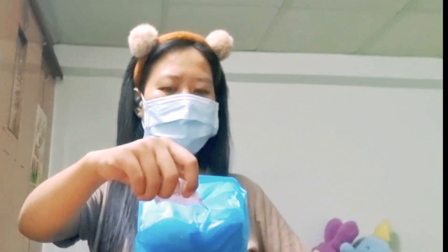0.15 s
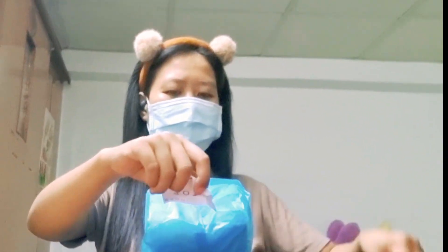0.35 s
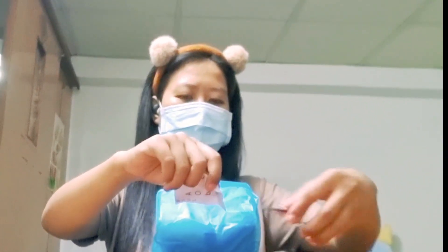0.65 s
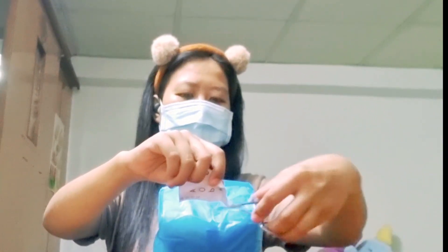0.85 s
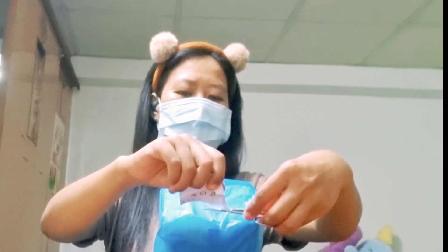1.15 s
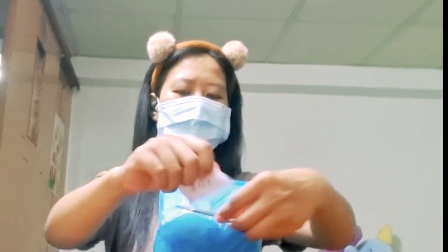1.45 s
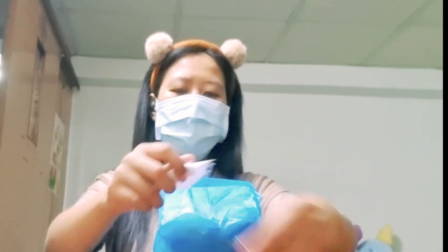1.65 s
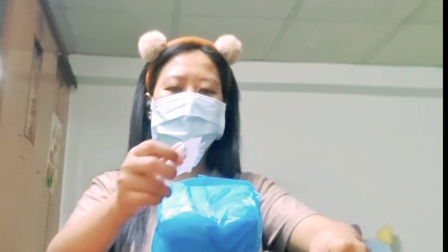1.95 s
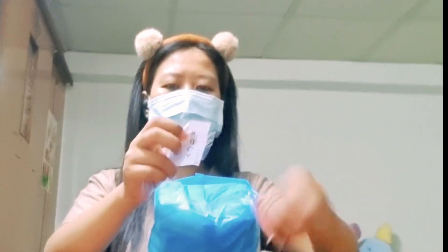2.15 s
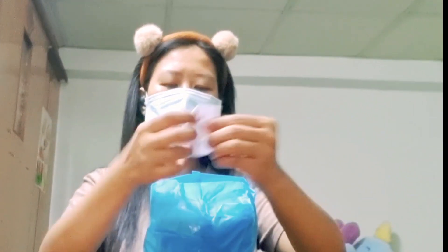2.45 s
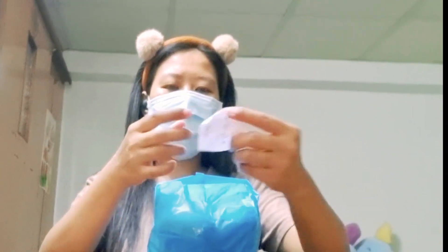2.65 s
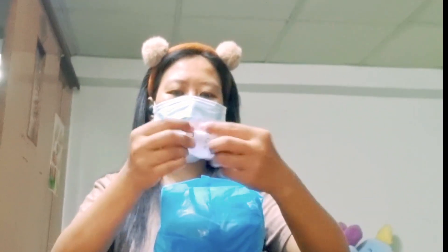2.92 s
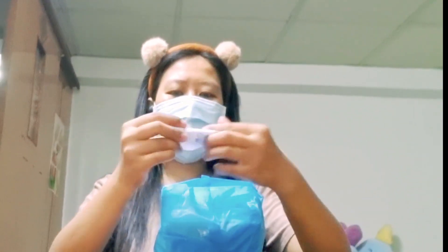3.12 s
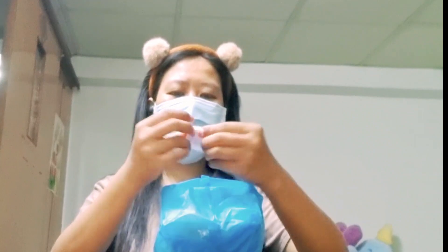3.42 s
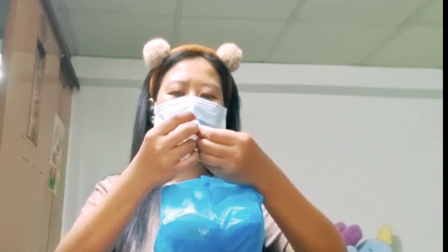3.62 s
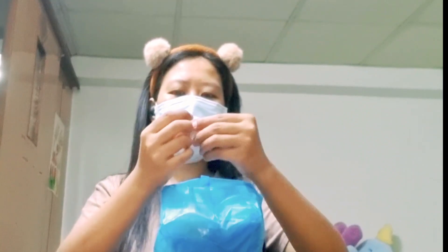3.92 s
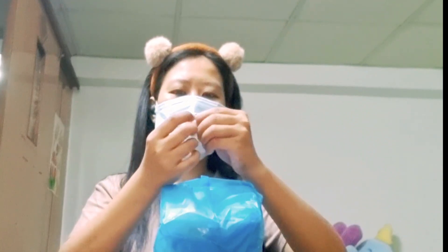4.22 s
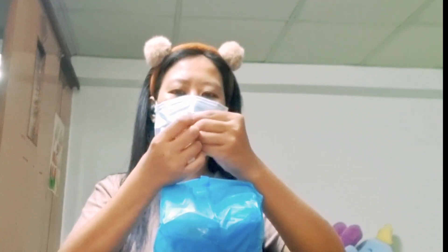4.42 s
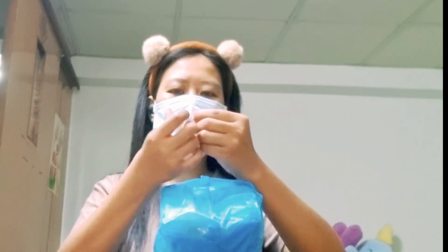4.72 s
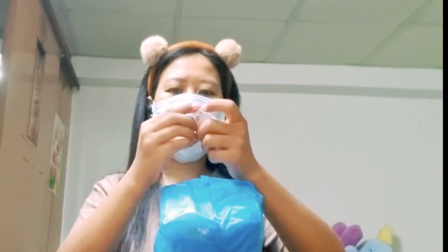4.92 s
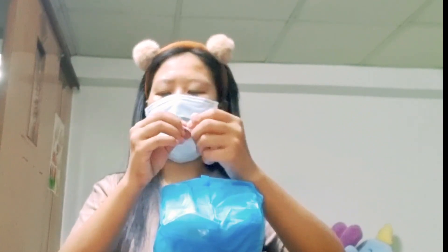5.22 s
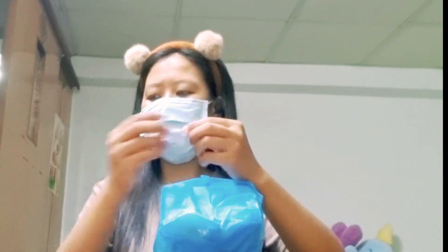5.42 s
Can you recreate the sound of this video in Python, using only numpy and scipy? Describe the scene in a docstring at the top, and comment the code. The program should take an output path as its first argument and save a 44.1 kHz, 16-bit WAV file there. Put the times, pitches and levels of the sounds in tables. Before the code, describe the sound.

Two knocks on a desk, crinkling plastic and a snip, a sharp rattle of dropped scissors, then lighter crackles.

```python
"""At a desk in a quiet room, hands pick at a small plastic pouch half a metre from a phone.
Stick-slip friction makes the film crinkle; its creases buckle with a snap and set small panels ringing.
A cutter is lifted and later dropped, rattling to rest as each impact excites the modes of desk and blades.
Sound mirrored by the desk top interferes with the direct sound at the phone's two microphone ports.
The desk thumps, the walls add a short reverberation, and the room rumbles faintly behind."""
import sys
import numpy as np
from scipy import signal
from scipy.fft import rfft, irfft, next_fast_len
from scipy.io import wavfile
from scipy.ndimage import uniform_filter1d, map_coordinates

SR = 44100
rng = np.random.default_rng(int(sys.argv[2]) if len(sys.argv) > 2 else 0)


def put_to_file(sound):
    """Save the sound as 16-bit audio at rate SR, in the file named by the first command-line argument."""
    columns = np.atleast_2d(sound).T  # one column per channel
    safe = np.clip(columns, -1, 1)
    whole_steps = np.round(safe * 32767)
    wavfile.write(sys.argv[1], SR, whole_steps.astype(np.int16))


N = 245637
SIZE = next_fast_len(N + SR)
HZ, TIME = np.arange(SIZE // 2 + 1) * SR / SIZE, np.arange(N) / SR

# Friction on the film: (time [s], rub level [dB], crackle level [dB])
FRICTION = [(0.0, -43.5, -50), (0.2, -50, -64.5), (0.68, -53.5, -62.5), (0.93, -53, -69),
            (1.041, -45, -65.5), (1.2, -51, -47), (1.5, -49.5, -50.5), (1.72, -53.5, -57),
            (2.0, -55.5, -72), (2.13, -53, -42), (2.28, -69, -64), (2.46, -77.5, -78.5), (2.642, -48, -43),
            (2.8, -74, -74.5), (3.149, -68.5, -45), (3.45, -65, -61), (3.818, -65.5, -55.5),
            (3.971, -74, -64), (4.59, -74, -80.5), (4.92, -67, -71.5), (5.099, -57, -47.5),
            (5.32, -73, -71), (5.499, -72, -51.5)]
# In the next three tables, the dB columns after the level are relative to it.
# Creases buckling: (time [s], level [dB], body [dB], treble [dB], t60 [s], panel pitch [Hz])
BUCKLES = [(0.111, -27, -6, -6, 0.056, 2370), (0.156, -37, -21, 0.5, 0.023, 4800),
           (0.192, -37.5, 7.5, -24, 0.06, 1530), (0.43, -35, -30, -8, 0.045, 2320),
           (0.4605, -34.5, -23, -14, 0.082, 4800), (0.4857, -37.5, 4.5, -3.5, 0.03, 2220),
           (0.5056, -30, -3, -10.5, 0.061, 2430), (0.545, -27, -1, -1.5, 0.054, 4300),
           (0.561, -21, -7, -2, 0.022, 2530), (0.5663, -24, -3, -1, 0.026, 4500),
           (0.815, -34.5, -4.5, -18, 0.084, 2700), (1.0543, -41, 1, -11, 0.22, 2560),
           (1.137, -34, -5, -15, 0.042, 1660), (1.155, -32, -22, 6, 0.041, 1750),
           (1.1703, -38, -9, 5.5, 0.023, 4560), (1.1872, -15, -8, -6, 0.034, 2710),
           (1.227, -33.5, -6, -3, 0.1, 2360), (1.277, -42, -7.5, -7, 0.1, 1620),
           (1.3039, -32.5, -15, -5, 0.064, 1520), (1.313, -32, -20, -8, 0.027, 2600),
           (1.3189, -25, -12, -1.5, 0.041, 4840), (1.3357, -26, -7.5, -3, 0.04, 2680),
           (1.496, -22, -14.5, -1.5, 0.066, 1490), (1.5106, -18, -2.5, -2, 0.023, 2000),
           (1.601, -36, -3, -8, 0.07, 2470), (1.6272, -29.5, 0, 1, 0.026, 2350),
           (2.4525, -50.5, 10.5, -6.5, 0.085, 3940), (2.544, -21, -6.5, -5.5, 0.094, 2970),
           (2.5553, -16.5, -4.5, -9.5, 0.039, 2080), (2.5614, -19, -2, -11, 0.062, 1610),
           (2.6785, -26.5, -8.5, -0.5, 0.042, 3900), (2.766, -44, -8.5, -3, 0.047, 2880),
           (2.9718, -46, -5.5, -1.5, 0.055, 4280), (3.08, -40.5, -7, 0.5, 0.051, 2700),
           (3.1003, -31, -2, -5.5, 0.0078, 2820), (3.112, -33, -16, -1, 0.024, 2780),
           (3.191, -45, -22, -8, .03, 2650), (3.212, -41, -28, -16, 0.018, 2000),
           (3.326, -40, 6.5, -7, 0.095, 1470), (3.3447, -34, -27, -10.5, 0.063, 2730),
           (3.418, -33, -8, 0.5, 0.092, 4230), (3.5991, -34.5, -3, 1.5, 0.18, 4420),
           (3.803, -50, -9.5, -7.5, .02, 2000), (3.8618, -27.5, -29.5, 1.5, 0.031, 1900),
           (4.209, -49, -25, 4, .03, 4600), (4.4656, -58.5, -10, 14.5, 0.089, 4186),
           (4.4901, -37, -30, 5, 0.093, 6700), (4.542, -53, -25.5, 6, 0.059, 5340),
           (4.7317, -37, -35.5, 2.5, 0.095, 6490), (4.981, -51.5, -12, 2, 0.08, 1620),
           (5.249, -44.5, -1, 3, 0.038, 2450), (5.3628, -31.5, -33.5, -3.5, 0.04, 2810),
           (5.3686, -29, -23, -6.5, 0.15, 1476), (5.491, -45, -5, 5, 0.065, 4140)]
# Soft scuffs of the film: (time [s], level [dB], thud [dB], body [dB], treble [dB], t60 [s])
FILM_SCUFFS = [(0.248, -58.5, 19.5, 23, -24, 0.15), (0.2872, -59.5, 26, 22.5, -15, 0.027),
               (0.595, -54, 22.5, 7, -5, 0.026), (0.993, -34, -7.5, -2, -11, 0.096),
               (1.476, -30.5, -17, 0, -1.5, 0.16), (1.506, -21, 3.5, -2.5, -3, 0.036),
               (1.706, -36, -11, -8, -6.5, 0.024), (2.5223, -31, -18, -6, -5, 0.092),
               (3.111, -32, -21.5, -21, -5.5, 0.077), (3.656, -42.5, -6.5, -9, -0.5, 0.082),
               (4.209, -57, -3.5, -10.5, 6, 0.4), (5.106, -52, -4, -4.5, -11, 0.53),
               (5.216, -42.5, -16, -6, -1, 0.11), (5.516, -49.5, -10, 0, 3, 0.059)]
# Cutter on desk: (time [s], level [dB], thud [dB], body [dB], treble [dB], desk [dB], steel [dB], t60 [s])
IMPACTS = [(0.0522, -17, -11.5, 3.5, -21, 1, -9.5, 0.081), (0.3285, -5, -11.5, -0.5, -17, 1, -8.5, 0.046),
           (1.797, -56.5, 24.5, 5, -1, -3, -12, 0.053), (1.918, -42, 5, 4, -22, -1, -5.5, 0.023),
           (1.9781, -19, -10, -2, 1.5, -2, 10.5, 0.0086), (1.984, -30.5, -4, 2.5, -0.5, 4, 16, 0.038),
           (2.0252, -6, -23.5, -10, -8, 0.5, 4, 0.046), (2.0477, -22.5, -23.5, 0, -13.5, -9.5, 1.5, 0.093),
           (2.07, -14, -18, 3.5, -10.5, -5, 0, 0.14), (2.084, 2.5, -21, -7.5, -24, -0.5, -0.5, 0.021),
           (2.0905, -4, -21.5, -5, -12, -3.5, -2.5, 0.031), (2.109, -23.5, -13.5, -4, -0.5, 0, -2.5, 0.11),
           (2.1464, -20, -23.5, 2, -18.5, -4, -1, 0.05)]
# A squeak, blades through film, skin on film:
# (time [s], level [dB], pitch [Hz], half width [Hz], half length [s])
SLIDES = [(0.694, -56, 5640, 150, 0.02), (1.471, -38.5, 4940, 350, 0.043), (5.105, -45, 580, 201, 0.078)]
# Deep thumps through the desk: (time [s], level [dB])
BOUNCES = [(0.035, -34), (.29, -28), (0.336, -28.5), (1.514, -25), (2.03, -42)]
# Position of the hands: (time [s], left minus right [dB])
HAND_BALANCE = [(0, 2), (4.3, 2), (5.57, 3)]
# Modes of the desk top with the cutter handle, and of the blades: (frequency [Hz], level [dB], t60 [s])
DESK_MODES = [(201, 2.5, 0.12), (374, -2.5, 0.068), (404, -1, 0.082), (580, -6.5, 0.096),
              (672.5, -3, 0.058), (736, -2, 0.024), (950, 2, 0.071), (1520, -2, 0.061),
              (2020, -10.5, 0.081), (2700, -6, 0.09)]
BLADE_MODES = [(401, 3, 0.047), (788, -1, 0.045), (2530, -1, 0.03), (4147, -0.5, 0.027), (4385, -2, 0.03),
               (4590, -3, 0.023), (7500, -9, 0.018), (14500, -22.5, .012)]
# Resonances and nulls: (frequency [Hz], width [Hz], gain [dB])
POUCH_EQ = [(1620, 330, 3), (2650, 300, 4), (3430, 700, -4.5), (4500, 700, 2.5), (6830, 500, 2),
            (12500, 7500, 2)]
HANDLE_EQ = [(970, 240, 4), (1550, 590, 4), (2750, 430, 5), (3500, 310, -4), (4430, 160, 9.5)]  # hollow cutter handle
LEFT_EQ = [(1252, 670, -19.5), (564, 590, -5.5), (1948, 180, -5), (3210, 530, -3), (11440, 19000, -8)]  # desk reflection and phone case, at each port
RIGHT_EQ = [(1190, 240, -14), (2360, 810, -10.5), (3130, 560, -16.5), (6600, 6200, -8), (10600, 2200, 6)]
ROOM_NULLS = [(146, 47, -6), (274, 48, -6.5)]
# Spectrum of the room noise: (frequency [Hz], relative density [dB])
ROOM_SPECTRUM = [(22, -25), (48, 8.5), (76, 7.5), (659, -22), (988, -24), (1160, -37.5), (1560, -23),
                 (4740, -28.5), (9070, -35.5), (14800, -25.5), (16000, -48.5)]
# Lower edge, centres of rumble, thud, body, crackle, treble and two air bands, upper edge: (frequency [Hz])
BANDS = [45, 85, 260, 850, 2100, 5000, 9500, 15000, 21000]
# Decay of a burst in each band, shortest at the top: (t60 multiplier [1])
DECAY_RATIOS = [3.4, 1.6, 1.33, 1.034, 1.63, 2.2, 0.48]
# The two air bands: (level relative to the treble [dB])
AIR_OFFSETS = [-15.5, -15]

LN_1000 = np.log(1000)  # amplitude falls 60 dB in one t60
RUMBLE_DB, SNAP_THUD_DB = -13, -10  # a burst's rumble relative to its thud; a snap's thud to its body
CUTTER_PAN_DB, CUTTER_LAG_MS = 2, 0.27  # gain and delay on the cutter's path to the left port
RIGHT_DB, RIGHT_LAG_MS, SHADOW_HZ, SHADOW_DB = -2, 0.06, 2000, -7


def crinkle():
    """Stick-slip friction: dense, uneven slips of the film crackle over a smooth rub of skin."""
    times, *levels = np.transpose(FRICTION)
    rub, crackle = (np.interp(TIME, times, db) for db in levels)
    gains = undb(band_db(rub - 2.5, rub, (rub + crackle) / 2 - 3, crackle, crackle - 1.5))
    impulses = np.abs(grains(per_second=560, spread_db=1.8))
    slips = unit_rms(np.convolve(impulses, np.exp(-np.arange(500) / 82))[:N])
    flicker = undb(2 * np.array([walk(60) for _ in gains]))
    roughness = 0.5 * np.clip(np.arange(7)[:, None] / 3, 0, 1)  # the low bands are smoother
    return mix_bands(gains * flicker * (roughness * slips + 1 - roughness) * rng.standard_normal(N))


def snaps():
    """Buckling: a crease releases its strain in a short crack over a fainter, longer rattle."""
    times, db, body, treble, t60, _ = np.transpose(BUCKLES)
    spectrum = (body + SNAP_THUD_DB, body, treble)
    cracks = np.column_stack([times, db, *spectrum, 0.3 * t60])
    rattles = np.column_stack([times, db - 7, *spectrum, t60])
    return (bursts(cracks, rise_ms=0.71, lumps_db=2.5, click=2.2)
            + bursts(rattles, rise_ms=25 * t60, lumps_db=4, click=0))


def panel_pops(boost_db=11.5, t60_cycles=24):
    """Free vibration: each snap leaves one small panel of film ringing at its natural frequency."""
    out, t = np.zeros(N + SR), np.arange(SR // 20) / SR
    for time, db, _, treble, _, hz in BUCKLES:
        gain = undb(db + boost_db + np.interp(np.log(hz), np.log(BANDS[4:6]), [0, treble]))
        fade = np.exp(-LN_1000 * t * hz / t60_cycles)
        start = int(time * SR)
        out[start:start + len(t)] += gain * fade * np.sin(2 * np.pi * hz * t)
    return out[:N]


def scuffs():
    """Sliding friction: brief rubs of the film, the longer ones swelling more slowly."""
    t60 = np.array(FILM_SCUFFS)[:, -1]
    return bursts(FILM_SCUFFS, rise_ms=114 * t60, lumps_db=3.5, click=0)


def swishes():
    """Forced resonance: the noise of each slide swells and fades within one soft spectral peak."""
    out = 0
    for time, db, hz, half_width, half_s in SLIDES:
        resonance = 1 / (1 + ((HZ - hz) / half_width) ** 2)
        noise = filtered(rng.standard_normal(N), unit_rms(resonance))
        out = out + undb(db) * noise * np.exp(-((TIME - time) / half_s) ** 2)
    return out


def cutter():
    """Impact excitation: each contact cracks, coloured by the hollow handle, and rings desk and blades."""
    rows = np.array(IMPACTS)
    desk = ring(DESK_MODES, coupling_db=rows[:, 5])
    blades = ring(BLADE_MODES, coupling_db=rows[:, 6])
    cracks = bursts(rows[:, [0, 1, 2, 3, 4, 7]], rise_ms=0.25, lumps_db=2, click=0.83)
    radiation = 1 / (1 + (160 / (HZ + 1)) ** 6)  # a small panel radiates little below its lowest mode
    return 0.73 * filtered(cracks, response(HANDLE_EQ)) + filtered(desk, radiation) + blades


def ring(modes, coupling_db, rise_s=0.00075):
    """Modal superposition: damped sines, varied at each blow as a loose tool never lands the same way."""
    out, t = np.zeros(N + SR), np.arange(SR // 4) / SR
    hz, mode_db, t60 = np.transpose(modes)[:, :, None]
    for (time, db, thud, body, treble, *_), coupling in zip(IMPACTS, coupling_db):
        scatter, detune = rng.standard_normal((2, len(modes), 1))
        blow_db = db + np.interp(np.log(hz), np.log(BANDS[2:6]), [thud, body, 0, treble])
        gains = undb(blow_db + coupling + mode_db + 2 * scatter)
        pitch = hz * (1 + 0.008 * detune)
        tones = gains * np.sin(2 * np.pi * pitch * t) * np.exp(-LN_1000 * t / t60)
        start = int(time * SR)
        out[start:start + len(t)] += tones.sum(axis=0) * (1 - np.exp(-t / rise_s))
    return out[:N]


def desk_thumps(hz=91, rise_s=0.0012, t60=0.17):
    """Damped oscillation: the whole desk bounces at one low frequency."""
    times, db = np.transpose(BOUNCES)
    age = np.maximum(TIME - times[:, None], 0)
    envelope = (1 - np.exp(-age / rise_s)) * np.exp(-LN_1000 * age / t60)
    return undb(db) @ (envelope * np.sin(2 * np.pi * hz * age))


def bursts(rows, rise_ms, lumps_db, click):
    """Stress relaxation: noise builds to an optional click, then decays at its own rate in each band."""
    envelopes, clicks, lead = np.zeros((7, N + SR)), np.zeros((7, N)), SR // 5
    t = np.arange(-lead, SR // 2) / SR
    for (time, db, thud, body, treble, t60), ms in zip(rows, np.broadcast_to(rise_ms, len(rows))):
        rise = np.exp(np.minimum(t, 0) * 1e3 / ms)
        fade = np.exp(-LN_1000 * np.maximum(t, 0) / (t60 * np.array(DECAY_RATIOS)[:, None]))
        gains = undb(db + band_db(thud + RUMBLE_DB, thud, body, 0, treble))
        start = int(time * SR)
        envelopes[:, start:start + len(t)] += gains[:, None] * rise * fade
        clicks[:, start] += click * gains * min(0.012 / t60, 1)  # a drawn-out burst lets go softly
    lumps = undb(lumps_db * walk(500))
    return mix_bands(clicks + envelopes[:, lead:lead + N] * lumps * rng.standard_normal(N))


def grains(per_second, spread_db):
    """Poisson process: independent tiny slips of uneven size."""
    impulses = rng.standard_normal(N) * (rng.random(N) < per_second / SR)
    return unit_rms(impulses * undb(spread_db * rng.exponential(size=N)))


def band_db(rumble, thud, body, crackle, treble):
    """Spectral envelope: seven band levels, the top two following the treble."""
    return np.array([rumble, thud, body, crackle, treble, *(treble + db for db in AIR_OFFSETS)])


def mix_bands(drives):
    """Filter bank: each drive passes its own band; neighbours cross-fade in log frequency."""
    out, position = 0, np.interp(np.log(HZ + 1), np.log(BANDS), np.arange(9))
    for k, drive in enumerate(drives):
        window = np.cos(np.pi / 2 * np.clip(position - k - 1, -1, 1)) ** 2
        out = out + filtered(drive, unit_rms(window))
    return out


def response(sections, echo_wins=False):
    """Resonance and interference: peaks and dips; a dominant echo turns the first dip's phase a cycle."""
    gain = 1
    for k, (hz, width, db) in enumerate(sections):
        detuning, damping = 1 - (HZ / hz) ** 2, 1j * HZ * width / hz ** 2
        sign = -1 if echo_wins and k == 0 else 1
        gain = gain * (detuning + sign * damping * undb(db)) / (detuning + damping)
    return gain


def filtered(x, gain):
    """Convolution theorem: filtering multiplies the spectrum by a gain."""
    return irfft(rfft(x, SIZE) * gain, SIZE)[..., :N]


def delay(ms):
    """Linear phase: the response of a pure delay."""
    return np.exp(-2j * np.pi * HZ * ms * 1e-3)


def walk(rate_hz):
    """Random modulation: held values, smoothed twice, with a spread near 1."""
    hold = int(SR / rate_hz)
    steps = np.repeat(rng.standard_normal(N // hold + 1), hold)
    return 1.284 * uniform_filter1d(uniform_filter1d(steps, hold), hold)[:N]


def undb(db):
    """Decibel law: level to amplitude ratio."""
    return 10 ** (np.asarray(db) / 20)


def unit_rms(x):
    """Normalisation to unit mean power."""
    return x / np.sqrt(np.mean(np.abs(x) ** 2))


def reverberation(x, t60=0.25, crossover_hz=5230):
    """Diffuse reflection: a short tail in which the walls absorb the treble sooner."""
    t = np.arange(SR // 2) / SR
    noise = rng.standard_normal(len(t)) * np.clip((t - 0.003) / 0.0029, 0, 1)
    slow, fast = (rfft(noise * np.exp(-LN_1000 * t / decay), SIZE) for decay in (t60, 0.75 * t60))
    lowpass = 1 / (1 + 1j * HZ / crossover_hz) ** 2
    return filtered(x, undb(-12) * unit_rms(slow * lowpass + fast * (1 - lowpass)))


def room_noise():
    """Partial coherence: low rumble and faint hiss, most alike at the two ports in the bass."""
    hz, db = np.transpose(ROOM_SPECTRUM)
    gain = undb(np.interp(np.log(HZ + 1), np.log(hz), db))
    mid = filtered(rng.standard_normal(N), gain)
    side = filtered(rng.standard_normal(N), gain * np.clip(HZ / 500, 0.55, 1))
    ports = np.array([mid + side, mid - side]) * undb(1.5 * walk(7.5))
    return unit_rms(ports) * undb([[-56], [-61]])


def scene():
    """Superposition: film, cutter, reflections, thumps and room noise add at the two ports."""
    film = filtered(crinkle() + snaps() + scuffs() + panel_pops() + swishes(), response(POUCH_EQ))
    knocks = cutter()
    direct = film + knocks
    shared_tail = reverberation(direct)
    pan = undb(np.interp(TIME, *np.transpose(HAND_BALANCE)) / 2)
    left_knocks = filtered(knocks, undb(CUTTER_PAN_DB) * delay(CUTTER_LAG_MS))
    left = film * pan + left_knocks + 1.06 * shared_tail + 0.7 * reverberation(direct)
    wander_ms = 0.13 * walk(4)  # moving hands vary the path to the right port
    right_film = map_coordinates(film, [np.arange(N) + wander_ms * SR / 1000], order=3)
    right = right_film / pan + knocks + 0.24 * shared_tail + reverberation(direct)
    # The phone body casts an acoustic shadow on the right port in the treble.
    shadow = undb(RIGHT_DB + SHADOW_DB / (1 + (SHADOW_HZ / (HZ + 1)) ** 6)) * delay(RIGHT_LAG_MS)
    left = filtered(left, response(LEFT_EQ + ROOM_NULLS))
    right = filtered(right, response(RIGHT_EQ + ROOM_NULLS, echo_wins=True) * shadow)
    return np.array([left, right]) + room_noise() + desk_thumps()


def record(dry):
    """Saturation and band limiting: the phone clips the loudest peaks, then cuts deep bass and top."""
    highpass = signal.butter(3, 40, "high", fs=SR, output="sos")
    lowpass = signal.ellip(10, 0.2, 60, 15900, fs=SR, output="sos")
    return signal.sosfilt(lowpass, signal.sosfilt(highpass, np.clip(dry, -0.9, 0.9)))


dry = scene()
out = record(dry)
put_to_file(out)
```